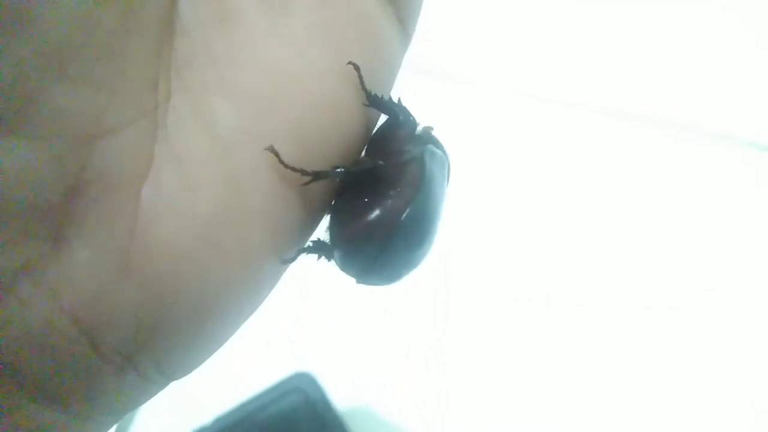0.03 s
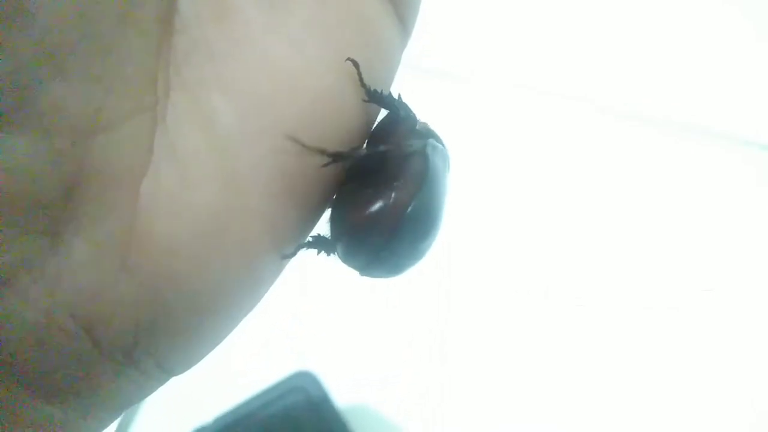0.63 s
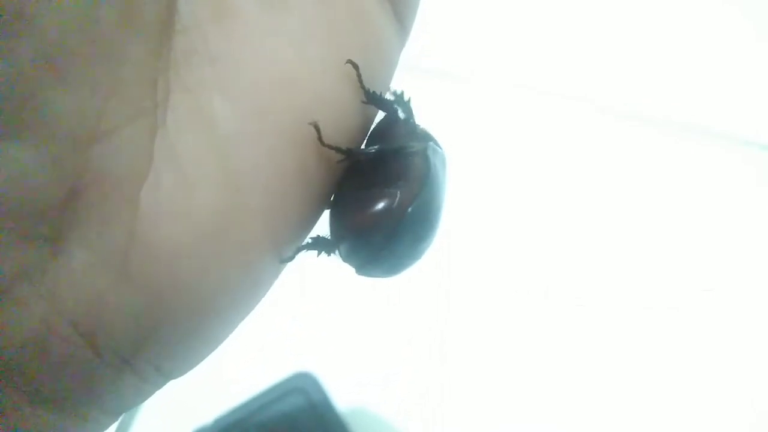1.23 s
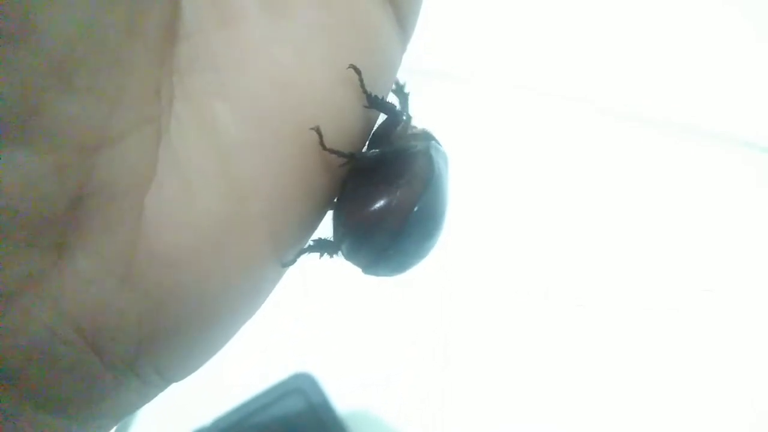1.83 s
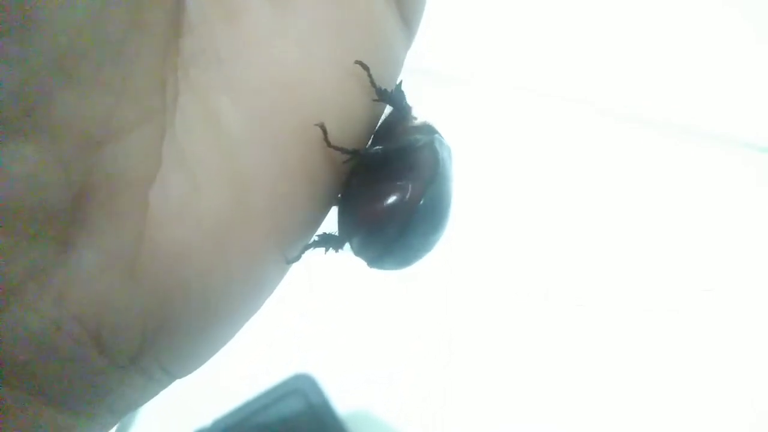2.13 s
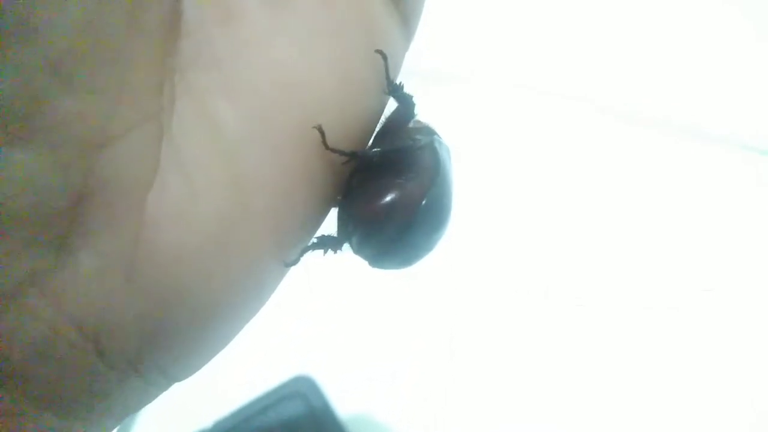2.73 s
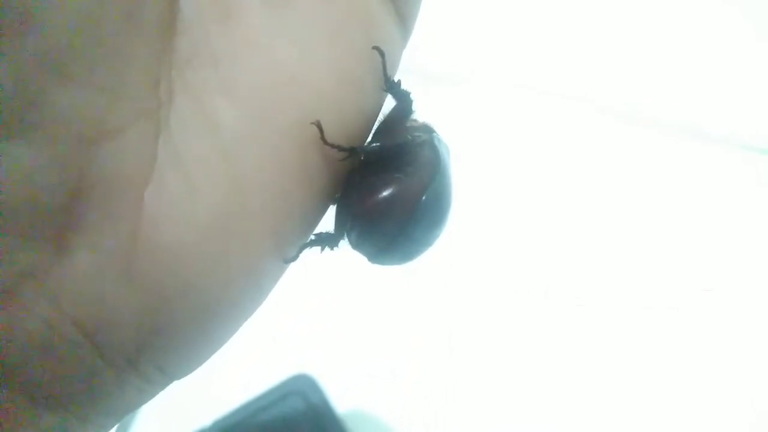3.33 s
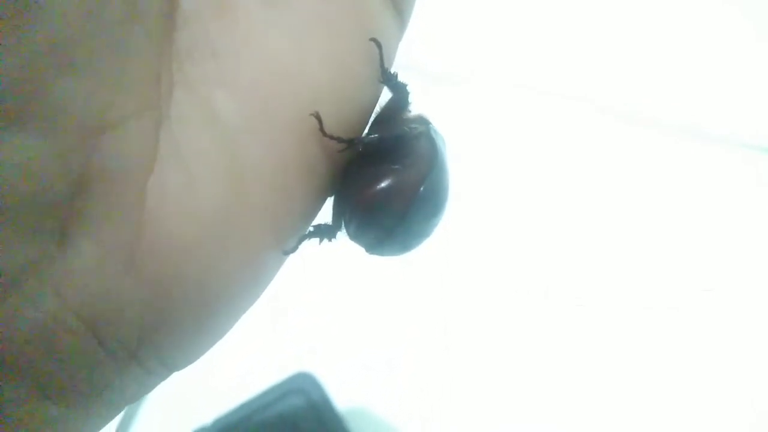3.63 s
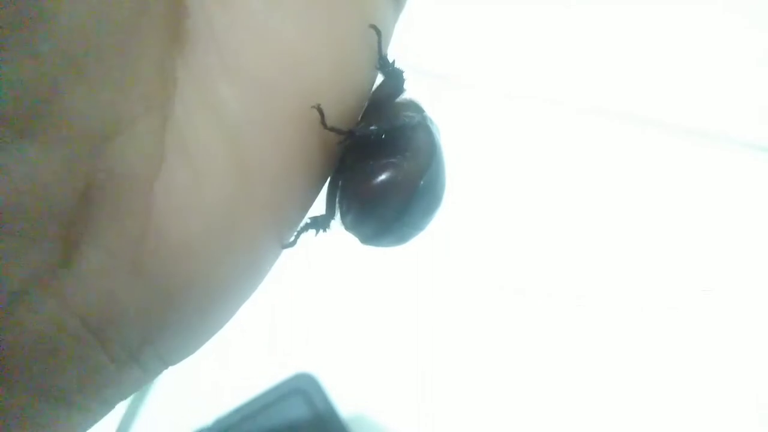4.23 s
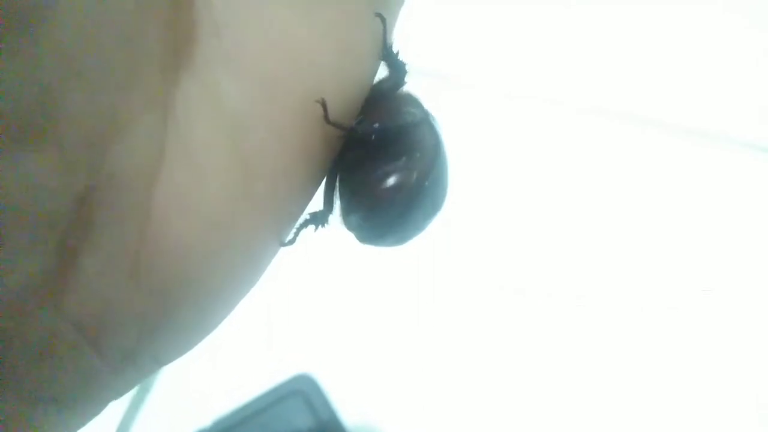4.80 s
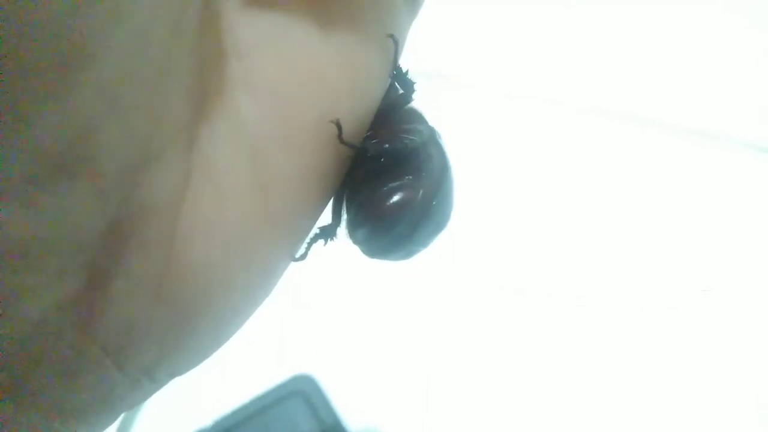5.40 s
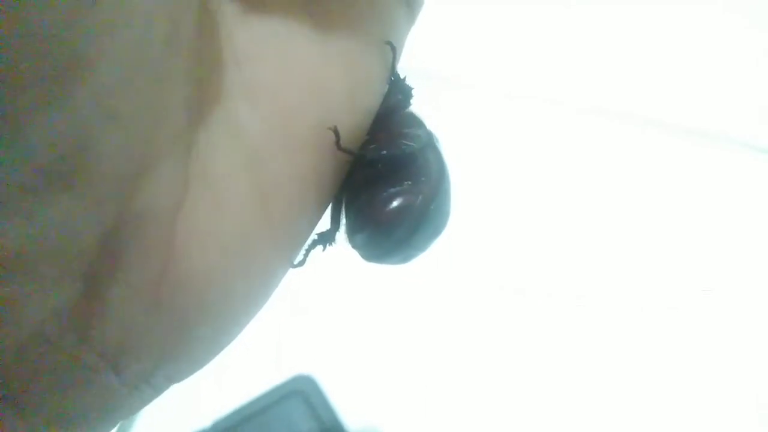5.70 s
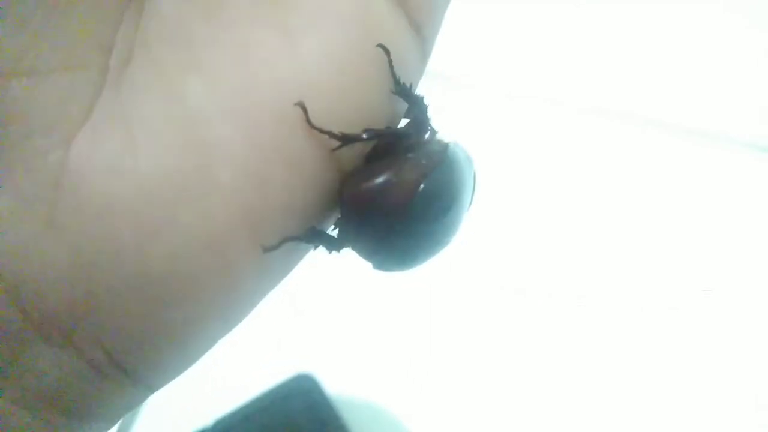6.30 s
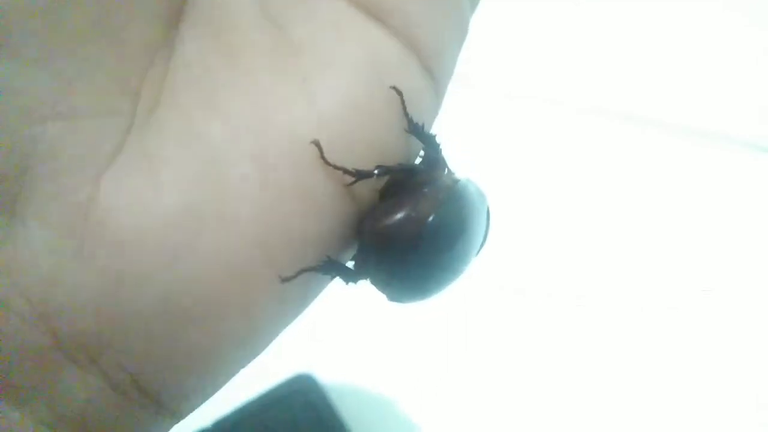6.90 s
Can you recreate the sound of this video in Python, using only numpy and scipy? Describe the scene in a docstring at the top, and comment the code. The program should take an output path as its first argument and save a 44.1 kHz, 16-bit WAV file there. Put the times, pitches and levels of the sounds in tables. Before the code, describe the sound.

A beetle rasps dryly about once a second over a low chugging engine, while distant road noise swells in the second half.

```python
"""A rasping beetle and distant traffic

A beetle held on a hand rasps once a second, each stroke a short dry scrape of its ridged file.
Behind walls an engine chugs, booms and drops to a slower beat; then road noise swells.
Thin whistles, faint high chirps and three tiny ticks sit on the microphone's hiss."""
import sys
import numpy as np
from scipy import signal
from scipy.fft import rfft, irfft, next_fast_len
from scipy.io import wavfile
from scipy.ndimage import uniform_filter1d, map_coordinates

SR = 44100
rng = np.random.default_rng(int(sys.argv[2]) if len(sys.argv) > 2 else 0)


def pcm_store(signal):
    """Save signal as 16-bit PCM."""
    levels = np.round(np.clip(np.atleast_2d(signal), -1, 1) * 32767)
    wavfile.write(sys.argv[1], SR, levels.astype(np.int16).T)


N = 315315


def amp(db):
    """Decibels to gain."""
    return 10 ** (np.asarray(db) / 20)


def unit(x):
    """x at an average strength (rms) of 1."""
    return x / np.sqrt(np.mean(x ** 2) + 1e-20)


def even(x):
    """x held near strength 1, without slow swings."""
    window = signal.windows.hann(int(0.122 * SR))
    power = signal.fftconvolve(x ** 2, window / window.sum(), "same")
    return x / np.sqrt(np.abs(power) + 1e-9)


def clock():
    """The time of every sample."""
    return np.arange(N) / SR


def curves(rows):
    """One value per sample for each column after the time."""
    times, *columns = np.transpose(rows)
    return [np.interp(clock(), times, c) for c in columns]


def wobble(rate):
    """A smooth curve through rate random points a second."""
    return map_coordinates(rng.standard_normal(int(N * rate / SR) + 4), [clock() * rate])


def filtered(x, response):
    """x with each frequency scaled by response(f)."""
    size = next_fast_len(N + SR // 2)
    return irfft(rfft(x, size) * response(np.fft.rfftfreq(size, 1 / SR)), size)[:N]


def coloured(x, points):
    """x shaped by (f/Hz, level/dB) points, at strength 1."""
    f, db = np.transpose(points)
    size = 2 ** 14
    gain = amp(np.interp(np.log(np.fft.rfftfreq(size, 1 / SR) + 1), np.log(f), db))
    cepstrum = irfft(np.log(gain))[:size // 2]
    cepstrum[1:] *= 2  # the filter rings only after a sound
    return unit(signal.fftconvolve(x, irfft(np.exp(rfft(cepstrum, size))))[:N])


def resonant(modes, f):
    """Gain of ringing peaks, each (f/Hz, width/Hz, level/dB)."""
    return np.sqrt(sum(amp(2 * db) / (1 + (2 * (f - hz) / width) ** 4) for hz, width, db in modes))


def ripples(f, depth_db, step_hz):
    """Gain with random peaks and dips across frequency."""
    return amp(depth_db * np.interp(f / step_hz, np.arange(400), rng.standard_normal(400)))


def noise(patchy_db):
    """White noise with drifting loud and soft patches."""
    spectrum = signal.stft(rng.standard_normal(N), nperseg=1024)[2]
    patches = uniform_filter1d(rng.standard_normal(spectrum.shape), size=4, axis=0)
    patches = uniform_filter1d(patches, size=9, axis=1)
    return unit(signal.istft(spectrum * amp(patchy_db * unit(patches)))[1][:N])


def impulses(phase, scatter_db):
    """A click of random size each time phase passes a whole number."""
    at = np.flatnonzero(np.diff(np.floor(phase)) > 0)
    train = np.zeros(N)
    train[at] = amp(scatter_db * rng.standard_normal(len(at)))
    return train


def room(x, t60):
    """The room's echo of x, fading 60 dB in t60 seconds."""
    t = np.arange(SR // 2) / SR
    tail = rng.standard_normal(len(t)) * amp(-60 * t / t60)
    return signal.fftconvolve(x, tail / np.linalg.norm(tail))[:N]


# tone of the hiss: f/Hz, level/dB
HISS_TONE = [(20, 24), (300, 3), (600, 4.5), (1500, 3.5), (3000, 2), (5000, -1), (7400, -2), (8000, 3.5),
             (8500, 6), (9000, -5), (9600, -3), (12600, -5), (13100, -6), (15500, -21)]
def hiss():
    """The microphone hisses softly throughout."""
    return amp(-77.5) * coloured(noise(patchy_db=3.5), HISS_TONE)


# engine speed: t/s, firings per second
FIRING_RATE = [(0, 20.52), (.9, 17.55), (1.2, 20.96), (1.8, 20.56), (2.3, 21.71), (3.15, 21.7),
               (3.6, 15.41), (4.3, 16.67), (4.6, 15.89), (5, 15.27), (5.7, 15.72), (6.2, 13.9),
               (6.5, 15.25), (7.15, 15.25)]
# engine loudness: t/s, thud level/dB, chug level/dB
ENGINE_LEVELS = [(0.0, -64, -69), (0.04, -59, -90), (0.18, -78.5, -73), (0.5, -58.5, -78.5),
                 (0.55, -67.5, -81), (0.61, -70.5, -54.5), (0.78, -79.5, -60.5), (0.9, -54.5, -60),
                 (0.96, -49.5, -60), (1.0, -52, -63), (1.04, -45.5, -65), (1.08, -55, -75),
                 (1.15, -54, -56.5), (1.29, -48.5, -57), (1.39, -51, -55), (1.45, -48.5, -51),
                 (1.87, -49.5, -50.5), (1.91, -50, -56), (2.25, -45.5, -53.5), (2.43, -41, -49),
                 (2.61, -42.5, -47), (2.67, -41.5, -50.5), (2.89, -41.5, -46.5), (2.97, -44, -51),
                 (3.13, -42.5, -47.5), (3.19, -43, -53.5), (3.23, -42.5, -52), (3.29, -55, -50),
                 (3.36, -44, -52), (3.42, -47.5, -66), (3.48, -51, -70.5), (3.64, -54, -54.5),
                 (3.68, -60, -61.5), (3.72, -56, -54.5), (3.84, -63, -65.5), (3.92, -43, -56.5),
                 (4.02, -55, -61.5), (4.08, -51.5, -61), (4.18, -49.5, -74), (4.22, -48, -52.5),
                 (4.44, -43, -50), (4.58, -44, -46), (4.68, -46, -46.5), (5.04, -41.5, -44.5),
                 (5.16, -42, -48), (5.32, -42, -43), (5.71, -41.5, -46), (5.73, -44, -47),
                 (5.99, -43.5, -45), (6.03, -41, -42), (6.21, -42, -47), (6.31, -42, -40.5),
                 (6.37, -40, -49), (6.49, -39, -39.5), (6.53, -36.5, -45), (6.83, -39, -43.5),
                 (6.87, -37, -48.5), (6.95, -41.5, -43), (6.99, -37.5, -51), (7.05, -40.5, -45),
                 (7.15, -43.5, -49.5)]
# how much of the thud is a steady boom: t/s, share/0-1
BOOM_SHARE = [(0, 0.14), (1.8, 0), (2.2, 0.56), (2.5, 0.92), (3.15, 0.82), (3.3, 0.13), (4.8, 0),
              (5.1, 0.46), (5.7, 0.03), (6.2, 0.4), (6.5, 0.66), (6.95, 0.7), (7.15, 0.43)]
# tones at 11 and 13 times the firing rate: t/s, lower share/0-1, upper share/0-1
SONG_SHARES = [(.5, 0.2, 0), (.62, 0, 0.52), (.78, 0, 0.45), (.88, 0.49, 0.4), (1.1, 0.09, 0.08),
               (1.4, 0.25, 0.01), (1.55, 0.34, 0), (1.8, 0.53, 0.05), (2, 0.03, 0), (2.25, 0, 0.38),
               (2.85, 0.01, 0.43), (3.1, 0, 0), (3.35, 0, 0)]
# exhaust through the walls, at the fast and the slow beat: f/Hz, level/dB
FAST_THUD = [(20, -19), (45, -33), (65, -9.5), (85, -16.5), (105, 4), (123, 6.5), (145, -10.5), (180, -8.5),
             (260, -63.5), (2000, -130)]
SLOW_THUD = [(20, -18), (45, -33), (62, -7), (85, 2), (112, 2), (135, -3.5), (160, -13), (250, -64.5),
             (2000, -130)]
FAST_CHUG = [(120, -43), (175, -17), (228, 0.5), (255, -1), (278, -2.5), (312, -15.5), (380, -18.5),
             (440, -27), (520, -42), (900, -63.5), (3000, -120)]
SLOW_CHUG = [(110, -27.5), (170, 1.5), (220, -0.5), (250, -8.5), (283, -2.5), (322, -21.5), (365, -16.5),
             (410, -25.5), (500, -34.5), (900, -55.5), (3000, -120)]
def engine():
    """Each firing sends a thud and a rough chug through the walls; overtones boom and sing."""
    rate, = curves(FIRING_RATE)
    thud_db, chug_db = curves(ENGINE_LEVELS)
    share, = curves(BOOM_SHARE)
    lower, upper = curves(SONG_SHARES)
    slow, = curves([(3.2, 0.12), (3.5, 0.98)])
    # how far the firings stand out from their echo
    punch, = curves([(0, 0.35), (.8, 0.53), (1, 1.4), (1.7, 1.47), (2.4, 0.75), (3.3, 0.59),
                     (4, 0.28), (4.6, 0.69), (5.7, 0.54), (6.1, 0.32), (7.15, 0.52)])
    phase = np.cumsum(rate) / SR + 0.17
    firings = punch * unit(impulses(phase + 0.011 * wobble(20), scatter_db=1.75))
    gas = np.exp(-0.47 * (phase % 1))  # swirling gas follows every firing

    def exhaust(rough, walls):
        puffs = unit(gas * rng.standard_normal(N))
        return even(coloured(firings + rough * puffs, walls))

    blend = lambda a, b: np.sqrt(1 - slow) * a + np.sqrt(slow) * b
    overtone = lambda n: np.sqrt(2) * np.sin(2 * np.pi * n * phase)
    boom = blend(overtone(5), overtone(6)) * amp(0.27 * wobble(8.4))
    thud = blend(exhaust(0.8, FAST_THUD), exhaust(1.0, SLOW_THUD))
    thud = np.sqrt(1 - share) * thud + np.sqrt(share) * boom
    song = (np.sqrt(lower) * overtone(11) + np.sqrt(upper) * overtone(13)) * amp(2.8 * wobble(14))
    chug = blend(exhaust(1.7, FAST_CHUG), exhaust(1.83, SLOW_CHUG))
    chug = np.sqrt(np.abs(1 - lower - upper)) * chug + song
    return amp(thud_db + 2.15) * even(thud) + amp(chug_db + .1) * even(chug)


# loudness of the whirr: t/s, level/dB
WHIRR_LEVELS = [(0, -106), (1, -102), (1.6, -95.5), (2, -83), (2.35, -89.5), (2.7, -79.5), (3.15, -76),
                (3.5, -89.5), (4.2, -83), (5.3, -75.5), (6.5, -81), (7.15, -87)]
def whirr():
    """The engine whirrs faintly above its chug."""
    tone = [(500, -20), (660, -6), (790, -20), (920, -7), (1030, 6.5), (1150, -7.5), (1400, -18.5),
            (3000, -19.5), (6000, -36.5), (12000, -54.5)]
    return amp(curves(WHIRR_LEVELS)[0] + 2.5) * even(coloured(noise(patchy_db=3.5), tone))


# thin tones: start t/s, end t/s, f/Hz, slide/Hz, level/dB
THIN_TONES = [(0, 0.602, 2777, -7.5, -77.5), (0.595, 0.776, 2780, 0, -81.5), (0.836, 1.244, 2766, -5, -80),
              (2.989, 3.105, 2760, -8, -81), (3.3, 3.49, 2766, 5, -74), (3.677, 3.76, 2766, -2, -77),
              (0.293, 0.71, 5920, 84, -82), (1.808, 2.14, 6280, 174, -79.5),
              (2.373, 2.508, 5850, 61, -81.5), (3.583, 3.703, 5800, 13, -79),
              (4.071, 4.447, 5930, -2, -76.5), (4.586, 4.962, 5840, 110.5, -75),
              (5.137, 5.65, 5900, 2, -82), (6.602, 7, 5800, 62.5, -80.5), (1.147, 1.553, 9050, 1, -82.5),
              (4.25, 4.423, 9130, 0, -84), (2.169, 2.21, 3730, 0, -76)]
def whistles():
    """Faint scratchy tones come and go."""
    t, out = clock(), np.zeros(N)
    flicker = wobble(150) + 1j * wobble(150)
    flutter = wobble(35)
    for start, end, hz, slide_hz, db in THIN_TONES:
        on = (t > start) & (t < end)
        progress = (t[on] - start) / (end - start)
        swell = np.sqrt(np.abs(np.sin(np.pi * progress))) * amp(2.7 * flutter[on])
        rough = (hz / 5000) ** 2  # higher tones break up more
        phase = np.cumsum(hz + slide_hz * progress) / SR
        tone = (1 + rough * flicker[on]) * np.exp(2j * np.pi * phase)
        out[on] += amp(db) * swell * unit(tone.real)
    return out


# loudness of the chirps: t/s, level/dB
CHIRP_LEVELS = [(0, -79.5), (1.5, -81.5), (3.4, -79), (4.4, -98), (5, -108), (7.15, -78)]
def chirps():
    """A high, narrow noise pulses about seven times a second."""
    beat = np.cumsum(7 + 2.57 * wobble(6.2)) / SR
    trill = filtered(rng.standard_normal(N), lambda f: resonant([(8620, 150, 0)], f))
    return amp(curves(CHIRP_LEVELS)[0] - 3) * unit(np.abs(np.sin(np.pi * beat)) * trill)


# strokes: t/s, level/dB, top edge f/Hz, length/s, ring f/Hz, brightness/dB per octave
RASPS = [(0.229, -57, 5250, 0.11, 1730, -1), (1.218, -57, 5850, 0.12, 2400, 2.5),
         (2.228, -58.5, 4420, 0.12, 2990, 0), (3.217, -56, 5000, 0.12, 2760, .5),
         (4.23, -56, 4300, 0.15, 3050, -0.5), (5.209, -56, 4900, 0.15, 2960, .5),
         (6.225, -56.5, 5480, 0.15, 4830, -0.5)]
# where the shell rings: f/Hz, width/Hz, level/dB
SHELL_RINGS = [(668, 94, -5.5), (1102, 80, -2.5), (1473, 280, -3), (1820, 220, 1), (2374, 470, -2.5),
               (2966, 390, 0), (3120, 120, 3), (3660, 260, 2.5), (4280, 150, -3.5), (4865, 200, -4),
               (5370, 250, -8.5), (6430, 200, -7.5), (6950, 240, -12), (9250, 300, -14)]
def beetle(teeth_hz=900, rise_s=0.02, bite_s=0.015):
    """A scraper drags over a file: uneven tooth clicks ring the shell, hardest at the start."""
    teeth = impulses(np.cumsum(teeth_hz * np.exp(.35 * wobble(400))) / SR, scatter_db=5)
    scrape = unit(teeth) + 1.27 * noise(patchy_db=2.5)
    scrape = filtered(scrape, lambda f: resonant(SHELL_RINGS, f) + amp(-26) * (f > 400))
    out = np.zeros(N)
    for start, db, edge_hz, length, ring_hz, bright_db in RASPS:
        t = clock() - start
        after = np.maximum(t, 0)
        # each stroke grips differently and picks out new pitches
        grip = lambda f: ripples(f, 2.5, step_hz=60) * amp(bright_db * np.log2((f + 100) / 2500))
        edge = lambda f: amp(-8) + 1 / np.sqrt(1 + (f / edge_hz) ** 50)
        rasp = unit(filtered(scrape, lambda f: grip(f) * edge(f)))
        # pressure builds fast, bites, then eases until the scraper lifts off
        build = np.exp(np.minimum(t, 0) / rise_s)
        press_db = 2.5 * np.exp(-(t / bite_s) ** 2) - 8 * (after / length) ** 2
        stroke = amp(db - 1.5 + press_db) * build * rasp
        # one pitch rings on after the rest
        ring = unit(filtered(scrape, lambda f: resonant([(ring_hz, 100, 0)], f)))
        ring *= 2 * amp(db - 15.5 - 60 * after / 0.62) * (1 - np.exp(-after / 0.023))
        out += stroke + ring + amp(-6) * room(stroke, t60=0.26)
    return out


# tiny snaps: t/s, level/dB, centre f/Hz, time to fade by 60 dB/s
SNAPS = [(1.091, -56, 6330, 0.01), (4.858, -45, 5800, 0.0071), (6.933, -67, 5550, 0.1)]
def ticks():
    """Bright ticks, as of a claw on shell, each with a short echo."""
    out = np.zeros(N)
    for start, db, hz, t60 in SNAPS:
        t = clock() - start
        snap = amp(db + 10 - 60 * np.abs(t) / t60) * (t > 0) * rng.standard_normal(N)
        out += filtered(snap, lambda f: resonant([(hz, 3800, 0)], f) ** 2)
    return out + amp(-9) * room(out, t60=.35)


# road loudness: t/s, rush level/dB, roar level/dB
ROAD_LEVELS = [(3.7, -83, -88), (4, -89, -77.5), (4.25, -80, -73), (4.45, -72, -82), (4.65, -65.5, -82.5),
               (4.8, -66.5, -78), (4.95, -60, -66.5), (5.1, -63.5, -69), (5.4, -58, -66.5),
               (5.7, -58.5, -66.5), (6.05, -57.5, -70), (6.5, -59, -68.5), (6.75, -59, -79.5),
               (6.95, -61, -81), (7.15, -63.5, -72)]
# tone of the high rush and the low roar: f/Hz, level/dB
RUSH_TONE = [(500, -40), (850, -14), (1050, -3.5), (1200, -5), (1350, -3), (1560, -1), (1740, -11.5),
             (2100, 0), (2700, 4), (3300, -6), (4000, -8), (4300, -7), (4800, -24), (5400, -32.5),
             (7000, -35), (16000, -47.5)]
ROAR_TONE = [(300, -25), (480, -6.5), (670, 4.5), (780, -2.5), (850, -11.5), (1200, -36.5)]
# where the rush rings: f/Hz, width/Hz, level/dB
RUSH_RINGS = [(1373, 170, 2), (2120, 280, -9), (2754, 120, -7.5), (3530, 60, -1.5), (4080, 70, -0.5),
              (4300, 91, -3.5)]
def road():
    """Traffic noise swells; reflections carve hollows in its tone that shift as it moves."""
    rush_db, roar_db = curves(ROAD_LEVELS)
    arrival, = curves([(3.6, 0.29), (4, 0.92)])
    air = coloured(noise(patchy_db=2.5), RUSH_TONE)
    air = filtered(air, lambda f: 1 + .8 * resonant(RUSH_RINGS, f))
    rush = np.zeros(N)
    for centre in np.arange(3.5, 8, .5):
        fade = np.maximum(0, 1 - np.abs(clock() - centre) / .5)
        rush += fade * unit(filtered(air, lambda f: ripples(f, 4, step_hz=70)))
    roar = even(coloured(noise(patchy_db=5), ROAR_TONE))
    return arrival * (amp(rush_db + 0.51 * wobble(12)) * rush + amp(roar_db + 1.5) * roar)


def scene():
    """The beetle close by, the traffic far off, and steady hiss."""
    return (hiss() + beetle() + engine() + whirr() + road() + ticks() + whistles() + chirps())[None]


def record(dry, top_hz=15500):
    """Soften both ends and cut the highest treble."""
    ends = signal.windows.tukey(N, .002)
    return filtered(dry[0] * ends, lambda f: f < top_hz)[None]


dry = scene()
out = record(dry)
pcm_store(out)
```